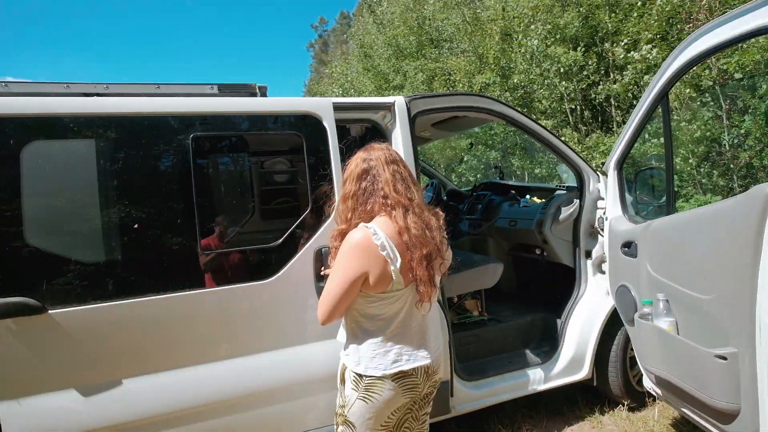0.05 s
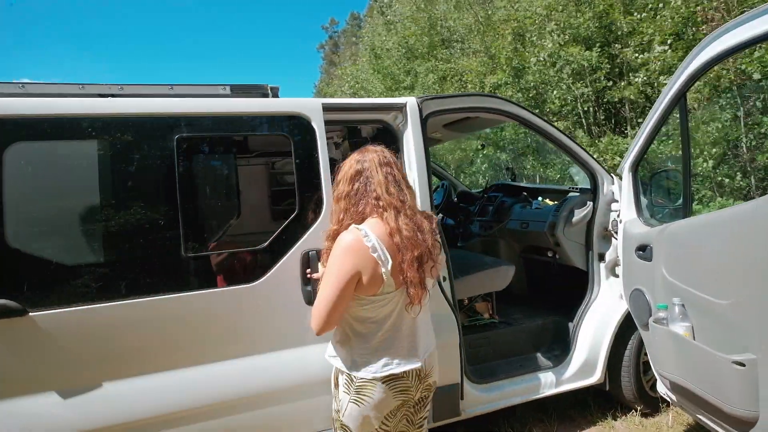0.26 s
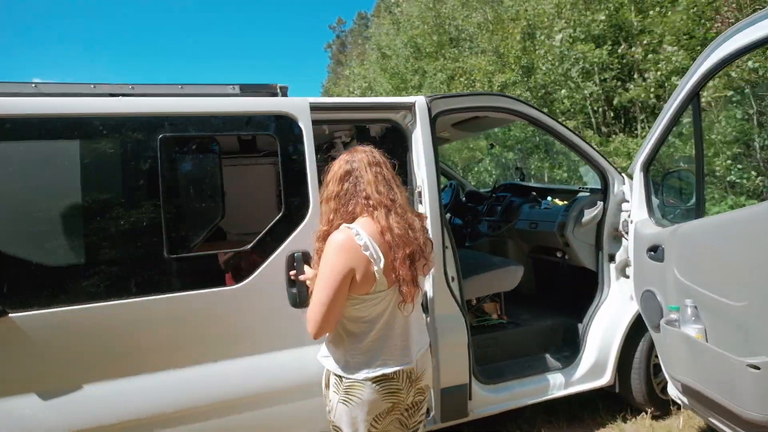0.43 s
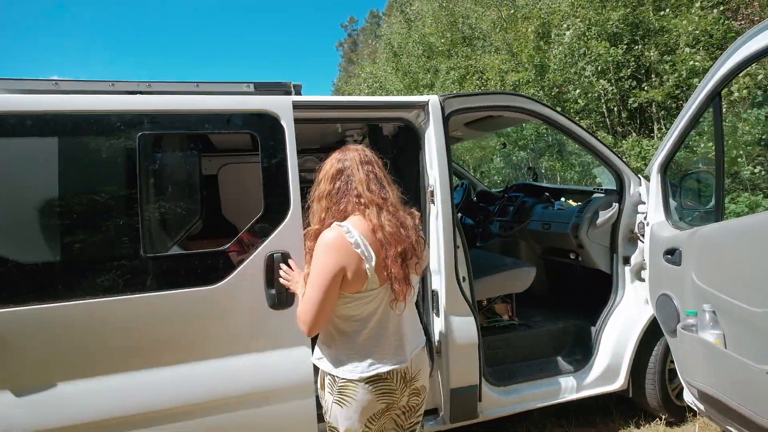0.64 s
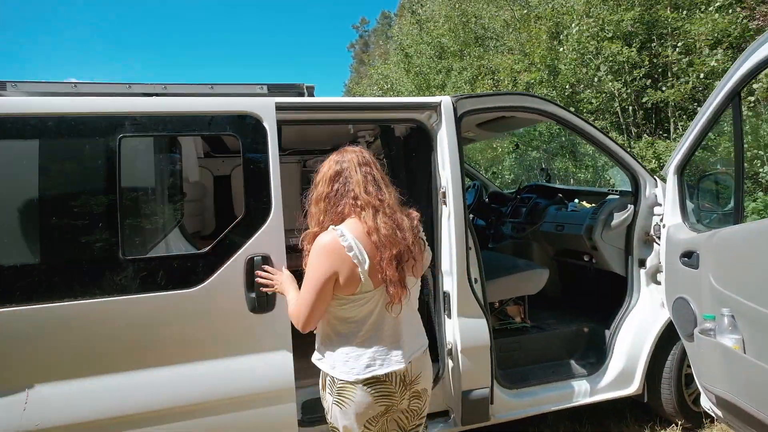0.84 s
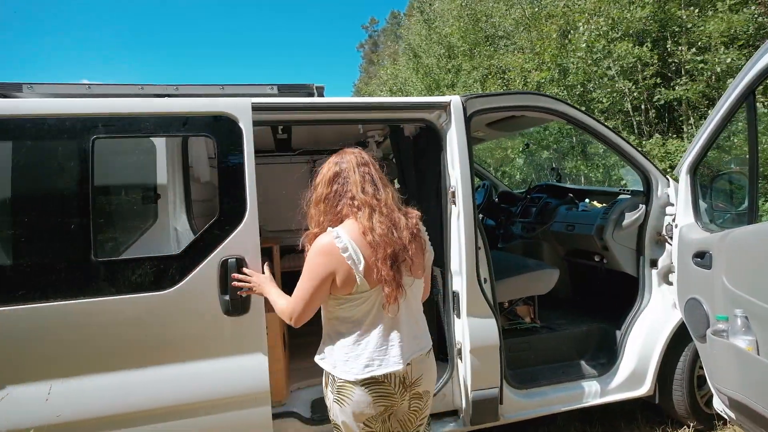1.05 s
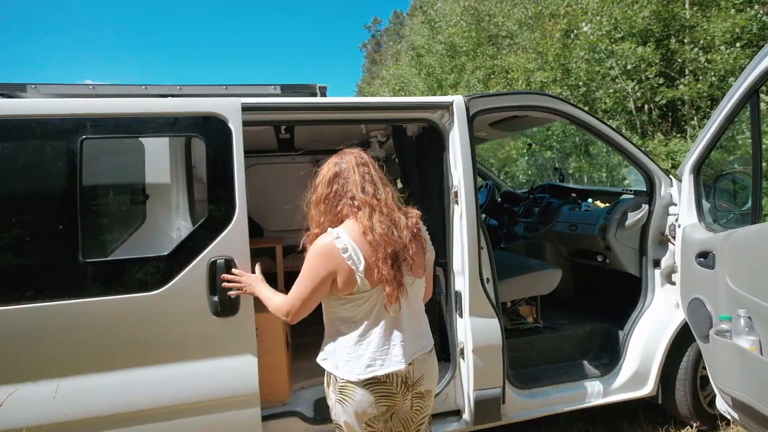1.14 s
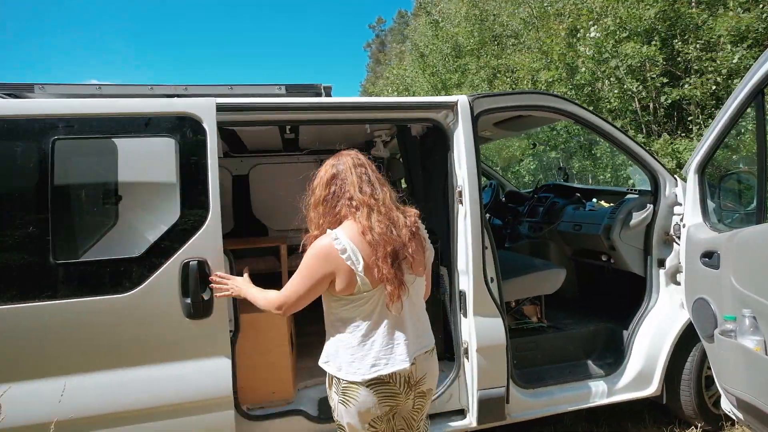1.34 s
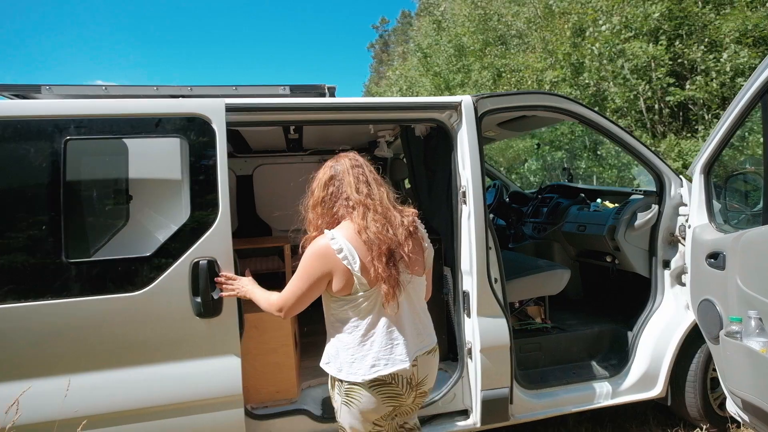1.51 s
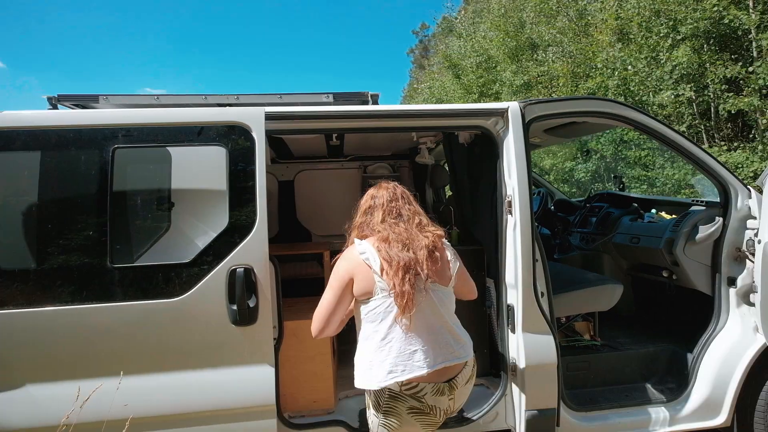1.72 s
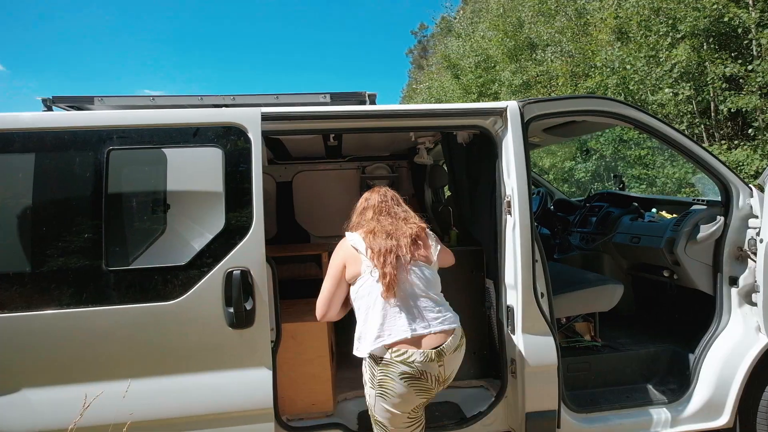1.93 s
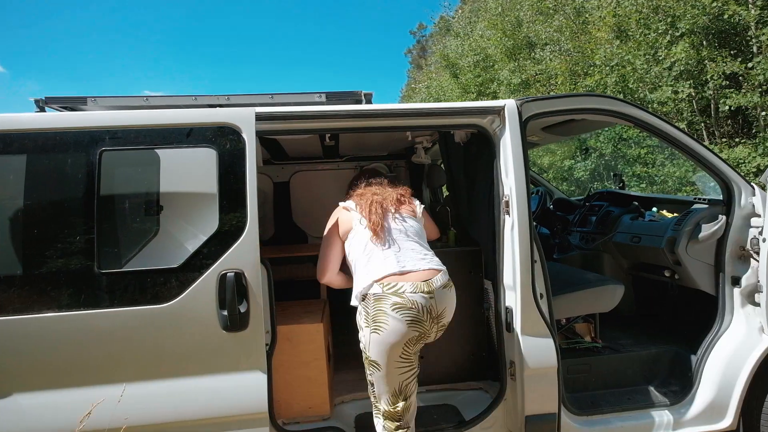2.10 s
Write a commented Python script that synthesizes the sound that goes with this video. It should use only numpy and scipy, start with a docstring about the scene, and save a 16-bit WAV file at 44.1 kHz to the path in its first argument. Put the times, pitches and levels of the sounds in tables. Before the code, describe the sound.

Sliding van door rolls open with hollow bumps, then hits its stop with sharp metallic clacks.

```python
"""Outdoors, beside a van, its sliding door rolls open: rail bumps ring the panel over broad grit noise,
and a thud marks each roller turn. The catch clicks, as noise bursts and a chattering spring; the door
shudders against its stop, as knocks and decaying panel modes. A few small dry ticks fall during the
rolling and after the stop; a soft thump follows the stop, as someone steps up. Filtered noise makes
the wind buffets, the far leaves and the hiss."""
import sys
import numpy as np
from scipy import signal
from scipy.fft import rfft, irfft
from scipy.io import wavfile

SR = 44100
rng = np.random.default_rng(int(sys.argv[2]) if len(sys.argv) > 2 else 0)


def to_wav(sig):
    """Store sig (one row per channel, or 1-D mono) as 16-bit WAV at the path in sys.argv[1].

    Samples outside -1..1 are clipped; the rate is SR.
    """
    pcm = np.clip(np.atleast_2d(sig), -1, 1) * 32767
    pcm = np.round(pcm).astype(np.int16)
    wavfile.write(sys.argv[1], SR, pcm.T)  # frames by channels


def undo_db(level):
    """Turn decibels back into plain size, where 20 dB means ten times bigger."""
    steps = np.asarray(level, float) / 20
    return 10 ** steps


N = 95476  # samples


def evened(x):
    """Scales x to rms 1."""
    return x / np.sqrt(np.mean(x ** 2) + 1e-20)


def read(points, hz):
    """Reads a spectrum table at hz, on a log frequency axis."""
    point_hz, value = np.transpose(points)
    return np.interp(np.log(hz + 1), np.log(point_hz + 1), value)


def curve(rows, column=1):
    """Interpolates one table column over the scene's time."""
    rows = np.array(rows)
    return np.interp(np.arange(N) / SR, rows[:, 0], rows[:, column])


def add(mix, start_s, sound):
    """Adds sound into mix in place, cut at the end."""
    part = mix[round(start_s * SR):][:len(sound)]
    part += sound[:len(part)]


def coloured(x, points):
    """Filters x by a spectrum table; rms 1."""
    gain = undo_db(read(points, np.fft.rfftfreq(len(x), 1 / SR)))
    return evened(irfft(rfft(x) * gain, len(x)))


def ringing(modes, size=20000):
    """Impulse response: a sum of exponentially decaying sine modes; energy 1."""
    t = np.arange(size) / SR
    ring = np.zeros(size)
    for mode_hz, level_db, t60_s in modes:
        decay = undo_db(level_db - 60 * t / max(t60_s, .005))
        ring += decay * np.sin(2 * np.pi * mode_hz * t)
    return ring / np.linalg.norm(ring)


def burst(points, t60_s, rise_s, size=8192):
    """A rattle of tiny coloured impacts, rms 1 before its fast rise and exponential decay."""
    grains_per_s = 2500
    t = np.arange(size) / SR
    strong = rng.random(size) < grains_per_s / SR
    grains = rng.standard_normal(size) * (.25 + strong * 3)
    rise = 1 - np.exp(-t / max(rise_s, 1e-5))
    decay = undo_db(-60 * t / max(t60_s, .003))
    return coloured(grains, points) * rise * decay


# rolling levels: start_s, rumble_db (rms), bright_relative_db
ROLLING_LEVELS = [(0, -32.5, -13), (.12, -39, -12), (.16, -34.5, -16.5), (.3, -31, -14), (.4, -30.5, -10),
                  (.55, -28, -13), (.625, -33, -12), (.72, -29.5, -12), (.86, -30.5, -9.5),
                  (1.05, -31, -10.5), (1.28, -29.5, -10.5), (1.35, -30.5, -10.5), (1.372, -35.5, -9.5),
                  (1.396, -25.5, -1.5), (1.48, -24, -4.5), (1.53, -31.5, -8), (1.6, -39, -13),
                  (1.66, -50.5, -20), (1.8, -55, -18)]
# broad rolling noise spectrum: freq_hz, relative_db (per Hz)
GRIT_SPECTRUM = [(26, -32), (45, -10), (70, -8), (125, 1.5), (164, -4.5), (236, -1), (322, -10),
                 (996, -23.5), (1220, -31), (3500, -51.5), (4550, -79), (7700, -120)]


def rolling():
    """Dense random rail bumps ring the panel modes, over grit; the part above a split has its own level."""
    bumps_per_s, spread_db, grit_db, split_hz = 900, 2.5, 0.5, 456
    strength = undo_db(spread_db * np.minimum(rng.exponential(1, N), 5))
    bumps = strength * (rng.random(N) < bumps_per_s / SR)
    bumps = bumps * rng.choice([-1., 1.], N)
    rung = evened(signal.oaconvolve(bumps, ringing(PANEL_MODES))[:N])
    grit = coloured(rng.standard_normal(N), GRIT_SPECTRUM)
    body = rung + undo_db(grit_db) * grit
    rumble = signal.sosfilt(signal.butter(3, split_hz, fs=SR, output="sos"), body)
    bright = signal.sosfilt(signal.butter(3, split_hz, "high", fs=SR, output="sos"), body)
    bright_gain = undo_db(curve(ROLLING_LEVELS, column=2))
    return undo_db(curve(ROLLING_LEVELS)) * (evened(rumble) + bright_gain * evened(bright))


# door panel modes: mode_hz, level_db, t60_s
PANEL_MODES = [(95.4, -5.5, 0.079), (123.5, 0, .14), (150, -2, .1), (209.8, 0, .17), (240, 0, .15),
               (287.3, -7.5, 0.089), (363.2, -6, 0.11), (400, -7.5, .1), (523.3, -11, 0.11),
               (628.3, -15.5, 0.095), (734, -13, 0.097), (876, -13, .12), (1000, -10, .07),
               (1251, -23, 0.059), (1660, -25, 0.057)]


def thud(knock_hz):
    """A short push rings the panel, under a knock mode at the place struck; the knock peaks at 1."""
    push_s, knock_t60_s, panel_db = 0.0011, 0.08, -6
    push = np.hanning(max(round(push_s * SR), 3))
    ring = signal.oaconvolve(ringing(PANEL_MODES), push)[:20000]
    knock = ringing([(knock_hz, 0, knock_t60_s)])
    return knock / abs(knock).max() + undo_db(panel_db) * ring / abs(ring).max()


# one bump per roller turn: start_s, thud_db, knock_hz, tick_db (before rise and decay), ping_db (peak)
ROLLER_TURNS = [(.05, -34, 263, -54, -70), (.16, -24.5, 260, -62, -72), (0.304, -24.5, 282, -47, -58),
                (.434, -24.5, 284, -48, -48), (0.564, -18, 238, -55, -51), (.689, -17, 237, -54, -47),
                (.808, -16, 239, -51, -60), (.925, -25.5, 378, -56, -50), (1.04, -24.5, 344, -60, -62),
                (1.161, -23, 305, -58, -56), (1.285, -26.5, 309, -56, -50)]
# tick spectrum: freq_hz, relative_db (per Hz)
TURN_TICK_SPECTRUM = [(900, -30), (1700, -2), (2700, 0), (3500, -10), (5000, -12), (7000, -26),
                      (12000, -50)]


def roller_bumps():
    """Each roller turn thuds the panel, then ticks and pings a spring a few ms later."""
    out = np.zeros(N)
    for start_s, thud_db, knock_hz, tick_db, ping_db in ROLLER_TURNS:
        add(out, start_s, undo_db(thud_db) * thud(knock_hz))
        add(out, start_s + .003, undo_db(tick_db) * burst(TURN_TICK_SPECTRUM, t60_s=0.084, rise_s=0.0015))
        add(out, start_s + .004, undo_db(ping_db) * ping(4500))
    return out


# door blows on catch and stop: start_s, thud_db, knock_hz
DOOR_BLOWS = [(1.304, -26, 905), (1.314, -19, 400), (1.343, -24, 130), (1.392, -18, 383),
              (1.41, -17.5, 199.4), (1.426, -21.5, 872), (1.438, -19, 170), (1.456, -21, 599),
              (1.468, -21, 90), (1.478, -18, 225), (1.487, -21, 420)]
# blow noise spectrum: freq_hz, relative_db (per Hz)
BLOW_SPECTRUM = [(45, -15), (150, -5.5), (400, -4), (900, -10), (1600, -20), (2800, -25), (5000, -38),
                 (8000, -41), (14000, -74)]


def blows():
    """Door hits catch and stop: each blow is a thud with a burst of noise."""
    noise_relative_db = -8
    out = np.zeros(N)
    for start_s, thud_db, knock_hz in DOOR_BLOWS:
        add(out, start_s, undo_db(thud_db) * thud(knock_hz))
        noise = burst(BLOW_SPECTRUM, t60_s=0.1, rise_s=0.0022)
        add(out, start_s, undo_db(thud_db + noise_relative_db) * noise)
    return out


# metal catch clicks: start_s, crack_db (before rise and decay), crack_t60_s, ping_db (peak), ping_hz
CATCH_CLICKS = [(1.303, -35, .04, -44, 3900), (1.307, -38, .05, -48, 4500), (1.329, -44, .04, -34, 4550),
                (1.378, -47, .02, -58, 4500), (1.382, -40, .03, -41, 4000), (1.396, -30, .03, -54, 4600),
                (1.405, -37, .035, -50, 4500), (1.413, -47, .04, -35, 4650), (1.427, -42, .04, -46, 4400),
                (1.432, -46, .04, -35, 4400), (1.443, -48, .02, -50, 4500), (1.450, -47, .03, -46, 4500),
                (1.456, -29, .03, -33, 4500), (1.466, -45, .05, -50, 4500), (1.487, -43, .025, -57, 4500),
                (1.523, -60, .05, -41, 4200)]
# crack spectrum: freq_hz, relative_db (per Hz)
CRACK_SPECTRUM = [(1200, -10), (2500, -7), (4500, -7), (6200, -15), (8800, -12.5), (10500, -19),
                  (13200, -17), (15700, -30), (17000, -60)]
# duller after-rattle spectrum: freq_hz, relative_db (per Hz)
CLATTER_SPECTRUM = [(500, -20), (1000, -3), (1400, -6), (1750, 0), (2050, -8), (2350, -3), (2800, -4),
                    (3300, -12), (3850, -7), (4500, -10), (7000, -21), (10000, -33), (15000, -60)]


def catch_clicks():
    """Each click of the catch is a sharp crack, a duller rattle and a spring ping."""
    out = np.zeros(N)
    for start_s, crack_db, crack_t60_s, ping_db, ping_hz in CATCH_CLICKS:
        add(out, start_s, undo_db(crack_db) * burst(CRACK_SPECTRUM, crack_t60_s, rise_s=.0005))
        add(out, start_s, undo_db(crack_db) * burst(CLATTER_SPECTRUM, t60_s=.095, rise_s=.003))
        add(out, start_s, undo_db(ping_db) * ping(ping_hz))
    return out


# catch spring modes: ratio (multiple of ping_hz), level_db, t60_s
SPRING_MODES = [(.88, -5, .02), (.95, -3, .03), (1.001, 0, .045), (1.05, -3, .03), (1.12, -5, .02)]


def ping(ping_hz):
    """The catch spring chatters briefly, exciting its close modes; peak 1."""
    chatter = burst([(100, 0), (20000, 0)], t60_s=.045, rise_s=.001, size=3000)
    modes = [(ping_hz * ratio, level_db, t60_s) for ratio, level_db, t60_s in SPRING_MODES]
    ring = signal.oaconvolve(ringing(modes, size=3000), chatter)
    return ring / abs(ring).max()


# small dry ticks: start_s, peak_db, centre_hz, width_hz
SMALL_TICKS = [(.497, -43, 2670, 200), (0.747, -46, 10800, 7000), (0.87, -44, 6500, 2520),
               (.879, -47, 7000, 3000), (1.839, -43, 1000, 1000), (1.865, -48, 3300, 500),
               (1.938, -37, 3400, 1800), (1.938, -41, 7000, 6000), (2.009, -43, 3500, 500),
               (2.01, -48, 4500, 1500), (2.071, -36, 1800, 1800), (2.071, -40, 5000, 5000),
               (2.087, -51, 5140, 500)]


def ticks():
    """Tiny band-limited impulses, each with a short rattle in the same band."""
    tail_db, centre = -14, 1024  # centre: sample index of the impulse
    out = np.zeros(N)
    spike = (np.arange(2048) == centre) * 1.
    for start_s, peak_db, centre_hz, width_hz in SMALL_TICKS:
        band = [(max(centre_hz - width_hz, 50), -30), (max(centre_hz - width_hz / 2, 100), -3),
                (centre_hz, 0), (centre_hz + width_hz / 2, -3), (centre_hz + width_hz, -30)]
        click = coloured(spike, band)
        add(out, start_s - centre / SR, undo_db(peak_db) * click / abs(click).max())
        add(out, start_s, undo_db(peak_db + tail_db) * burst(band, t60_s=.03, rise_s=.0005))
    return out


# soft thump spectrum: freq_hz, relative_db (per Hz)
STEP_SPECTRUM = [(30, -4), (80, 0), (250, -10), (450, -15), (700, -40), (2000, -70)]


def step():
    """A soft, dull thump: one low noise burst."""
    start_s, level_db = 1.709, -36  # level before rise and decay
    out = np.zeros(N)
    add(out, start_s, undo_db(level_db) * burst(STEP_SPECTRUM, t60_s=.1, rise_s=.003))
    return out


# wind buffeting: start_s, level_db (rms)
WIND_LEVELS = [(0.0, -33), (0.05, -24), (0.3, -17), (0.33, -26.5), (0.65, -19), (0.68, -29), (1.0, -21),
               (1.17, -34.5), (1.29, -21), (1.39, -40), (1.47, -21), (1.57, -33.5), (2.13, -30),
               (2.16, -38)]
# wind spectrum: freq_hz, relative_db (per Hz)
WIND_SPECTRUM = [(2, -14), (6, -2), (12, -0.5), (20, -4), (32, -11), (45, -24), (90, -36), (300, -83)]


def wind():
    """Wind buffets the microphone: very low noise with a moving level."""
    return undo_db(curve(WIND_LEVELS)) * coloured(rng.standard_normal(N), WIND_SPECTRUM)


# far air and leaves spectrum: freq_hz, relative_db (per Hz)
AIR_SPECTRUM = [(29, -43), (60, -12), (180, -18.5), (238, -14.5), (296, -20), (553, -24.5), (1010, -24.5),
                (1550, -29), (3000, -38), (6110, -41), (10000, -45), (15600, -57)]


def air():
    """The far wash of air and leaves: steady filtered noise."""
    level_db = -54.5
    return undo_db(level_db) * coloured(rng.standard_normal(N), AIR_SPECTRUM)


# treble hiss: start_s, level_db (rms)
HISS_LEVELS = [(0, -60.5), (.5, -60), (.95, -60), (1.28, -62), (1.5, -54), (1.56, -61), (1.7, -63),
               (1.72, -68), (2.16, -67.5)]
# treble hiss spectrum: freq_hz, relative_db (per Hz)
HISS_SPECTRUM = [(1200, -27), (2200, -10), (3000, -9.5), (4700, -5.5), (5600, -7.5), (7900, -12.5),
                 (10000, -24), (14000, -53)]


def hiss():
    """Treble-filtered noise with a moving level."""
    return undo_db(curve(HISS_LEVELS)) * coloured(rng.standard_normal(N), HISS_SPECTRUM)


def scene():
    """Sums all sources at one microphone, the same in both channels."""
    door = rolling() + roller_bumps() + blows() + catch_clicks()
    small_sounds = ticks() + step()
    outdoors = wind() + air() + hiss()
    return np.tile(door + small_sounds + outdoors, (2, 1))


def roll_off(x):
    """The treble ends steeply here."""
    return signal.sosfilt(signal.butter(12, 15740, fs=SR, output="sos"), x)


# faint hiss of each channel's own: start_s, level_db (rms)
SELF_NOISE_LEVELS = [(0, -72), (1.7, -72), (1.72, -69), (2.16, -69)]


def record(dry):
    """Adds independent faint white noise to each channel."""
    noisy = dry + undo_db(curve(SELF_NOISE_LEVELS)) * rng.standard_normal(dry.shape)
    return roll_off(noisy)


dry = scene()
out = record(dry)
to_wav(out)
```